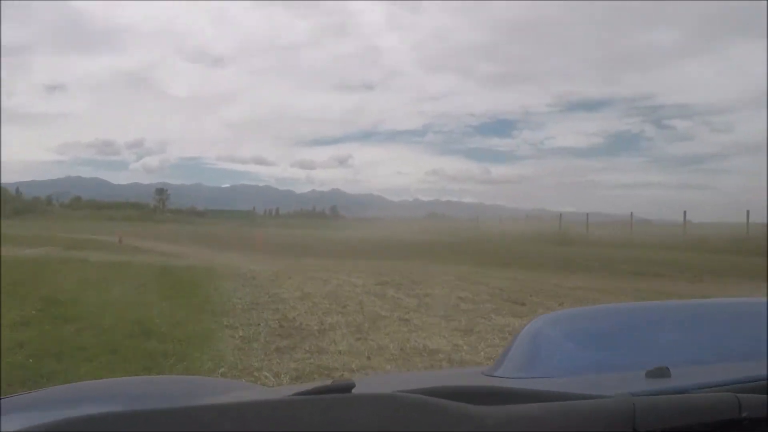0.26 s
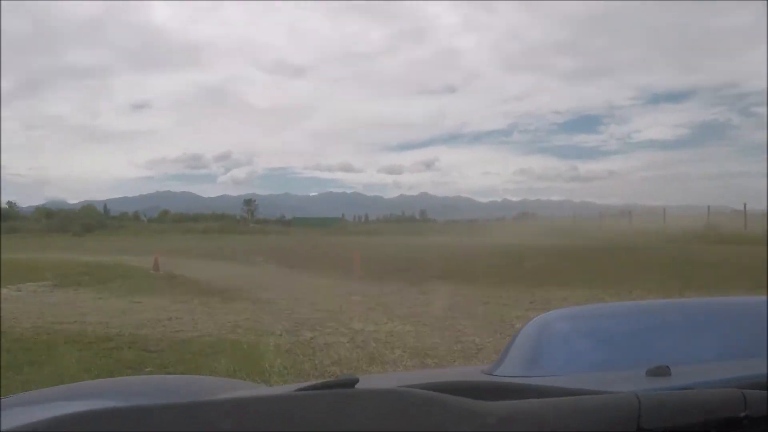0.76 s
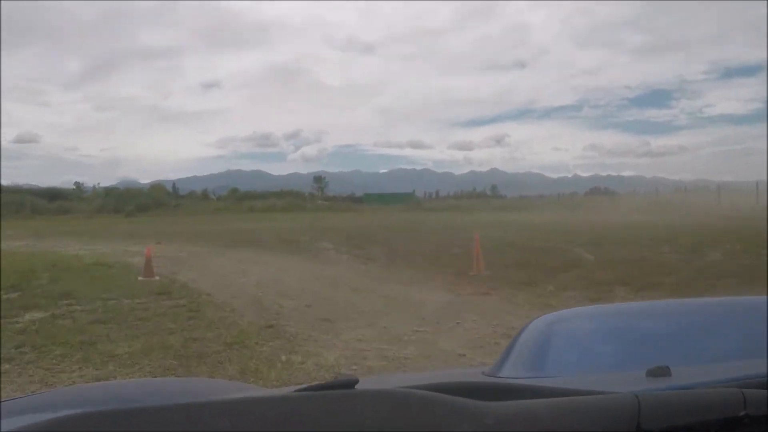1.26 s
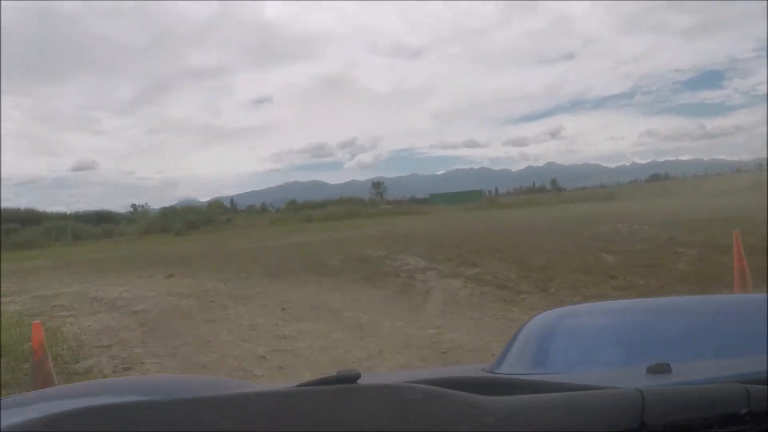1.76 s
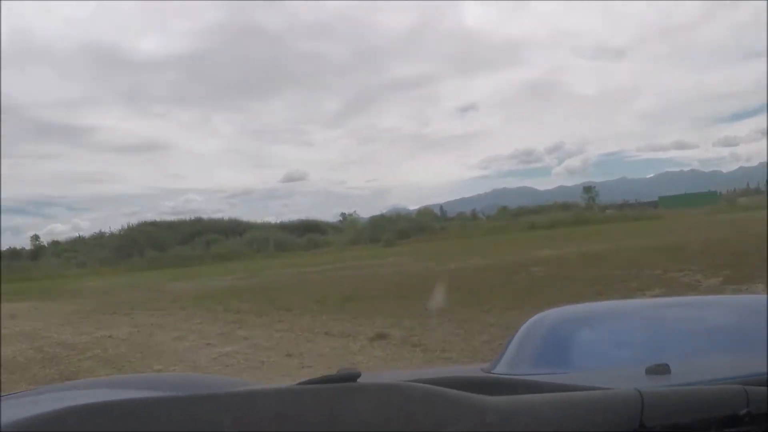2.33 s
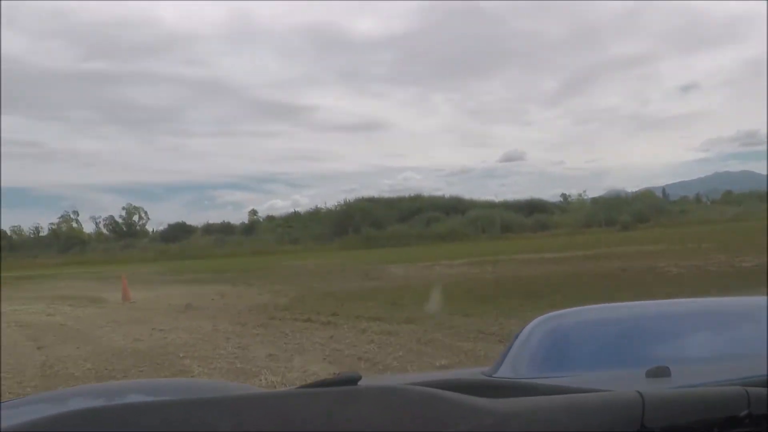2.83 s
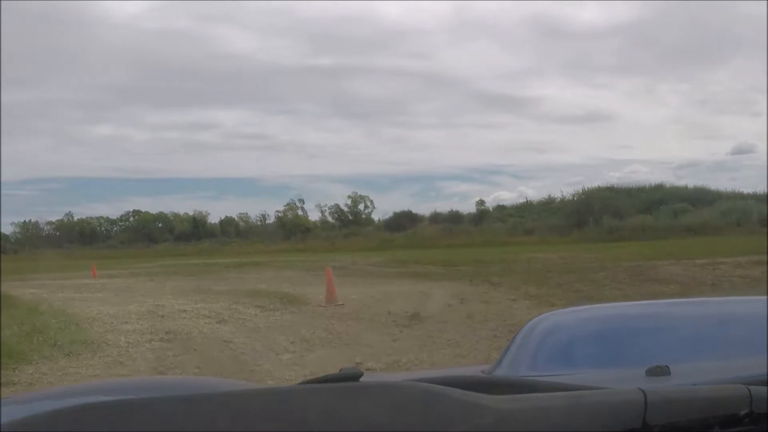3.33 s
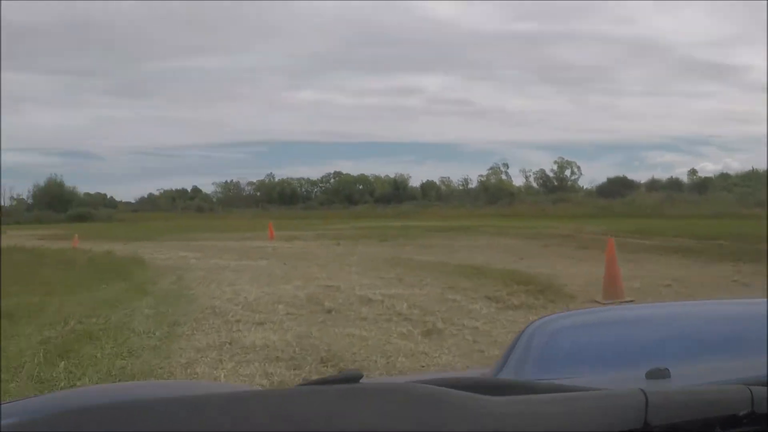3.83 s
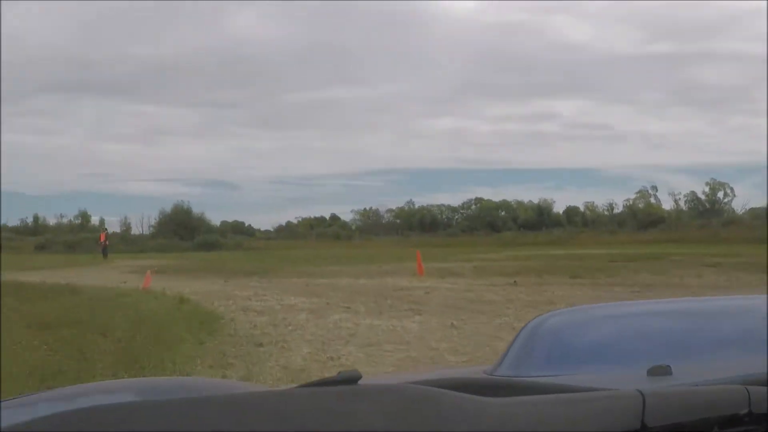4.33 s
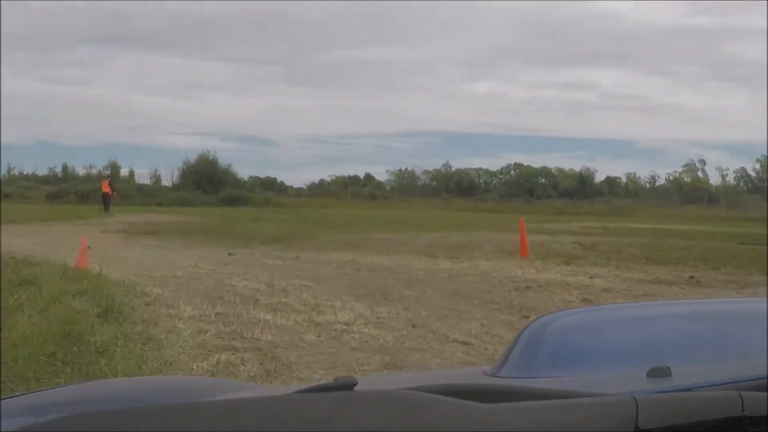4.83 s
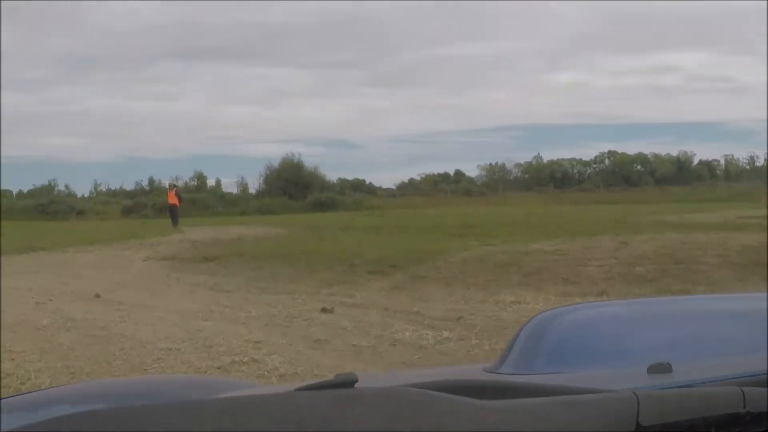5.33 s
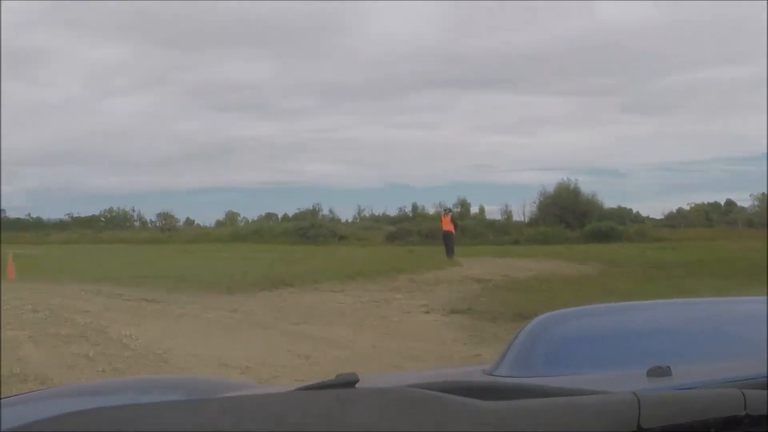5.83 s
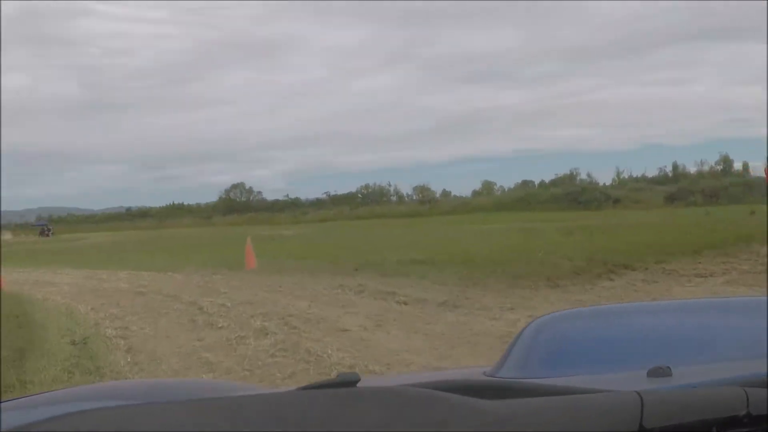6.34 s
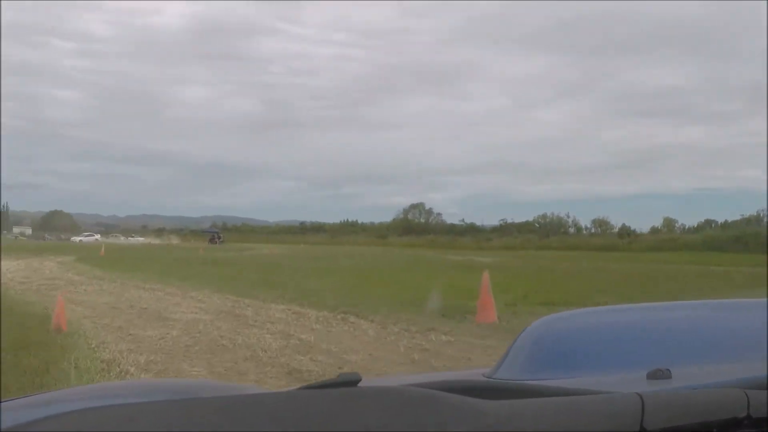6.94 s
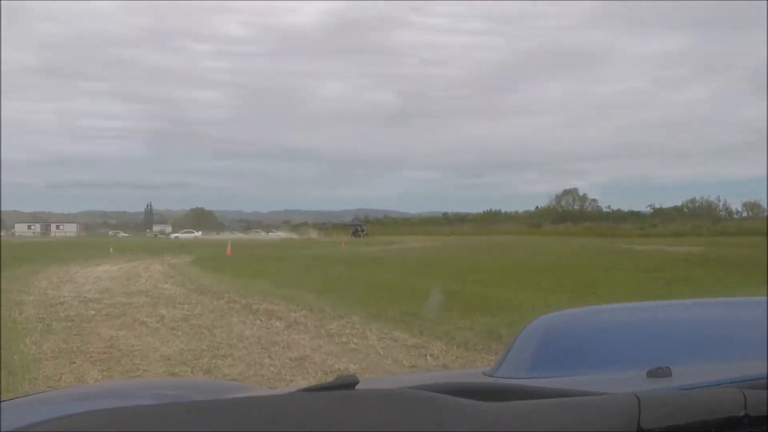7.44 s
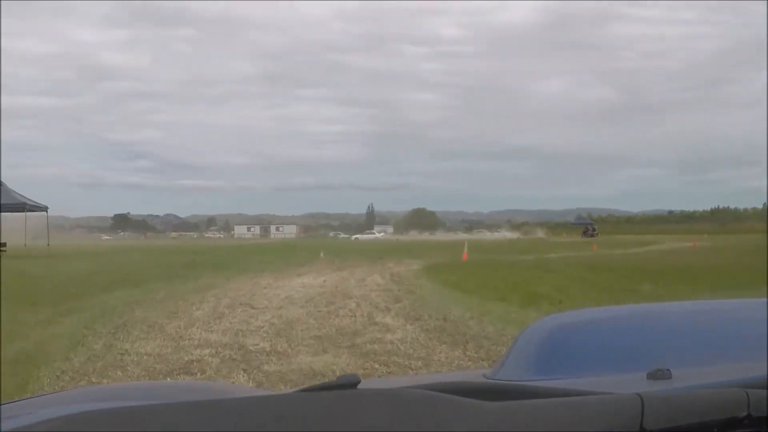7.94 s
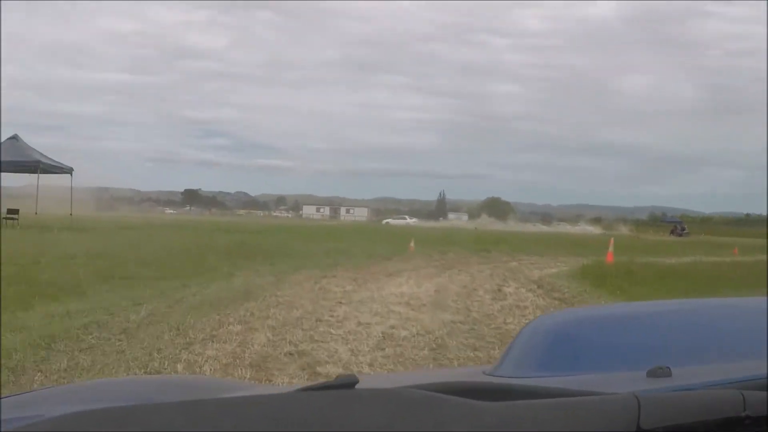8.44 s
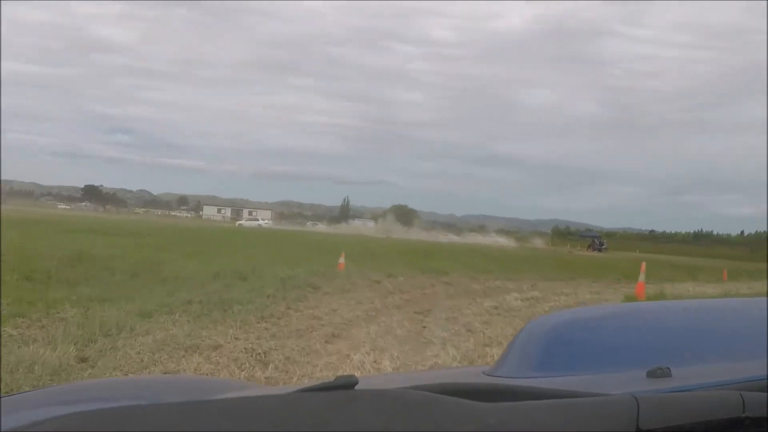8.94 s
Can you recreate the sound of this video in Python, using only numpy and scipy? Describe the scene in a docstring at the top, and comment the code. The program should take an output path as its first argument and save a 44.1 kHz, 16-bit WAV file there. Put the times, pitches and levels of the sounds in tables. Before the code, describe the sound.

A car slides hard around a dirt and grass course, engine droning under heavy wind buffeting while stones tick and crack on its bodywork.

```python
"""A car slides round a dirt and grass course, heard from a camera on its bonnet.
From 0 s: wind buffets the housing into a bass limiter, an engine drones as a stack of crank orders,
tyres scrub as filtered grains, and small stones tick at random. Timed stone contacts, faint to loud,
ring panel modes from 0.2 s; dirt showers from 0.5 s; low body thuds and clunks from 1.3 s; panel
chatter from 2.5 s. The engine sags near 4.6 s and peaks in speed near 7 s."""
import sys
import numpy as np
from scipy import signal
from scipy.fft import rfft, irfft, next_fast_len
from scipy.io import wavfile
from scipy.ndimage import uniform_filter1d, minimum_filter1d, map_coordinates

SR = 44100
rng = np.random.default_rng(int(sys.argv[2]) if len(sys.argv) > 2 else 0)


def materialize(psi):
    """Save the field psi as 16-bit PCM at rate SR to the path in sys.argv[1].

    A 1-D psi becomes a single channel; in a 2-D psi each row is a channel.
    """
    bounded = np.clip(np.atleast_2d(psi).T, -1, 1)
    quanta = np.round(bounded * 32767).astype(np.int16)
    wavfile.write(sys.argv[1], SR, quanta)


N = 405279
T = np.arange(N) / SR


def undb(db):
    """Decibels to gain."""
    return 10 ** (np.asarray(db) / 20)


def unit(x):
    """Scale to rms 1."""
    return x / np.sqrt(np.mean(x ** 2))


def curves(table):
    """Each column of a table, joined by straight lines in time."""
    time_s, *columns = np.transpose(table)
    return [np.interp(T, time_s, column) for column in columns]


def colour(x, points):
    """Shape a spectrum by (frequency [Hz], level [dB]) points, silent beyond them; rms 1."""
    size = next_fast_len(N)
    point_hz, point_db = np.transpose(points)
    bin_hz = np.arange(size // 2 + 1) * SR / size
    bin_db = np.interp(np.log(bin_hz + 1), np.log(point_hz), point_db, left=-np.inf, right=-np.inf)
    return unit(irfft(rfft(x, size) * undb(bin_db), size)[:N])


def walk(rate_hz):
    """Random levels, each held 1 / rate_hz, slewed; rms 1."""
    size = int(SR / rate_hz)
    steps = np.repeat(rng.standard_normal(N // size + 1), size)
    return unit(uniform_filter1d(steps, size))[:N]


def grains(rate_hz, spread_db):
    """Random impacts of either sign, mostly small with a few large ones; rms 1."""
    chance, size, sign = rng.random(N), rng.exponential(size=N), rng.choice([-1, 1], N)
    return unit((chance < rate_hz / SR) * sign * undb(spread_db * np.minimum(size, 5)))


def jolts(rate_hz, fade_s, rise_s):
    """Random bumps that rise quickly and fade; mean near 0, rms 1."""
    kicks = (rng.random(N) < rate_hz / SR) * rng.random(N)
    surge = signal.lfilter([1], [1, -np.exp(-1 / (fade_s * SR))], kicks)
    return unit(uniform_filter1d(surge - surge.mean(), int(rise_s * SR)))


def resonate(x, hz, width_hz):
    """One resonance, gain 1 at its centre."""
    return signal.lfilter(*signal.iirpeak(hz, hz / width_hz, SR), x)


def strike(modes, scrape_s, scrape, scatter):
    """A blow and its crumbling scrape ring decaying modes, randomly detuned; rms 1 over the first 10 ms."""
    t = T[:SR // 5]
    push = scrape * unit(np.exp(-t / scrape_s)) * rng.standard_normal(len(t)) / np.sqrt(len(t))
    push[0] += 1
    ring = np.zeros(len(t))
    for k, (hz, t60_s, db) in enumerate(modes):
        mode_hz = hz * (1 + scatter * rng.standard_normal())
        decay = np.exp(-np.log(1000) * t / t60_s)
        ring += undb(db) * decay * np.sin(2 * np.pi * mode_hz * t) * (-1) ** k
    hit = signal.fftconvolve(push, ring)[:len(t)]
    return hit / np.sqrt(np.mean(hit[:SR // 100] ** 2))


def add(out, time_s, sound):
    """Mix a sound in at time_s."""
    i = max(int(time_s * SR), 0)
    out[i:i + len(sound)] += sound[:N - i]


EDDY_WANDER = .06  # rms share of pitch


def eddies(points, steadiness):
    """Resonant turbulence: pitch wanders with airflow, shed vortices even out the swing of plain noise."""
    flow = np.cumsum(1 + EDDY_WANDER * walk(6))
    noise = colour(rng.standard_normal(N), points)
    x = map_coordinates(noise, [flow], order=1, mode="mirror")
    envelope = np.abs(signal.hilbert(x, next_fast_len(N))[:N])
    swing = uniform_filter1d(envelope, SR // 25)
    return unit(x / (swing + 0.074) ** np.clip(steadiness, 0, 1))


# Wind spectra: (frequency [Hz], relative level [dB])
BUFFET_SPECTRUM = [(10, -27), (18, -6.5), (26, -3.5), (34, -3), (41, 9), (46, 3.5), (52, -1.5), (60, -7.5),
                   (75, -24.5)]
FLUTTER_SPECTRUM = [(45, -42), (62, -8), (80, -2), (100, -5), (120, -3), (135, -11), (155, -17.5),
                    (190, -35), (300, -49)]
# Flutter before swing and lulls: (time [s], level [dB])
FLUTTER_LEVEL = [(0, -15.5), (1.6, -18.5), (2.25, -15), (2.7, -19), (3.6, -20), (4.3, -21), (4.75, -27.5),
                 (5.25, -19.5), (5.85, -19.5), (6.3, -24.5), (6.9, -19), (7.75, -20.5), (8.4, -21),
                 (8.65, -16.5), (8.85, -20), (9.19, -17.5)]
# Buffeting lulls: (time [s], depth [dB], half length to 1/e of depth [s])
LULLS = [(2.401, 15, 0.029), (2.8, 6, 0.063), (4.593, 12.5, 0.051), (5.984, 9.5, 0.094), (7.25, 4, 0.022),
         (8.18, 5, 0.089), (8.531, 8.5, 0.038)]
# Flow swing spectrum: (rate [Hz], relative level [dB])
SWING_SPECTRUM = [(1.8, -10), (3.2, -2), (6, 2), (12, -11.5), (20, -22.5)]
BUFFET_DB, BUFFET_DB_PER_SCRUB_DB = -10, 0.42  # level at 0 dB scrub; slope
SWING_RMS_DB, FLUTTER_DB_PER_LULL_DB = 2.5, 0.5


def wind(scrub_db):
    """Slow housing buffeting under faster flutter; when one weakens the other takes over."""
    swing_db = SWING_RMS_DB * colour(rng.standard_normal(N), SWING_SPECTRUM)
    lull_db = sum(depth_db * np.exp(-((T - s) / half_s) ** 2) for s, depth_db, half_s in LULLS)
    buffet_db = BUFFET_DB + BUFFET_DB_PER_SCRUB_DB * scrub_db - lull_db + swing_db
    flutter_db = curves(FLUTTER_LEVEL)[0] + FLUTTER_DB_PER_LULL_DB * lull_db - swing_db
    buffet = undb(buffet_db) * eddies(BUFFET_SPECTRUM, steadiness=0.38)
    flutter = undb(flutter_db) * eddies(FLUTTER_SPECTRUM, steadiness=0.55)
    return buffet + flutter


# Engine: (time [s], crankshaft speed [turns/s], effort at order 2 [dB])
REVS = [(0, 61.5, -3), (.4, 59.7, -2), (.9, 56.5, 0), (1.2, 54.3, -2), (1.5, 59.3, 0), (1.8, 55, -1),
        (2.15, 56, -1), (2.5, 54, -1), (3, 56, -1), (3.3, 52, 0), (3.6, 55, -2), (4.1, 55, -3),
        (4.6, 48, -9), (5.2, 48.5, -6), (5.9, 51.8, 0), (6.35, 57.2, 1), (6.5, 61.5, 2), (6.65, 63, 4.8),
        (6.8, 61.5, 2.5), (6.92, 65.5, 4), (7.0, 70.6, 0), (7.1, 70.3, 0), (7.2, 66.3, -2), (7.3, 67.6, -1),
        (7.4, 63.5, -1.5), (7.55, 68, -1), (7.9, 56, -2), (8.2, 53.5, -2), (8.7, 54.5, -1.5),
        (9.19, 58, -1)]
# Exhaust and body response: (frequency [Hz], gain [dB])
EXHAUST_RESPONSE = [(85, -1), (100, 5.5), (110, 5.5), (126, 1), (142, -7), (160, -5), (200, 0), (222, 3.5),
                    (255, 0), (283, 5), (310, 0), (335, -1), (360, 2), (377, 7), (395, 6), (415, 1),
                    (440, 6), (470, -1), (520, -4), (700, -10)]
# Engine lines before effort and exhaust: (multiple of crank speed [1], level [dB])
ENGINE_ORDERS = [(2, -30), (2.5, -35), (3, -45), (3.5, -48), (4, -41), (4.5, -46), (5, -49), (5.5, -53),
                 (6, -44.5), (6.5, -53), (7, -51), (7.5, -57), (8, -53), (9, -58), (10, -57)]
BRIGHTEN_PER_ORDER = .2  # extra effort share per order above 2
LEVEL_ROUGHNESS = .2  # rms share of level


def engine():
    """Crank-order tones glide through resonances, speed and level wavering at random."""
    crank_hz, effort_db = curves(REVS)
    waver = 1 + .0045 * walk(16)
    turns = np.cumsum(crank_hz * waver) / SR
    response_hz, response_db = np.transpose(EXHAUST_RESPONSE)
    out = np.zeros(N)
    for order, order_db in ENGINE_ORDERS:
        order_effort_db = effort_db * (1 + BRIGHTEN_PER_ORDER * (order - 2))
        exhaust_db = np.interp(order * crank_hz, response_hz, response_db)
        level_db = order_db + order_effort_db + exhaust_db + 2 * walk(9)
        out += undb(level_db) * np.sin(2 * np.pi * (order * turns + rng.random()))
    return out * (1 + LEVEL_ROUGHNESS * walk(55))


# Tyre spectra: (frequency [Hz], relative level [dB])
RUMBLE_SPECTRUM = [(100, -18), (160, 1), (210, 3), (300, -1.5), (450, -11.5), (650, -17), (1000, -31.5),
                   (2000, -67.5)]
SOIL_SPECTRUM = [(250, -7.5), (500, 6.5), (750, 3), (1000, 0.5), (1280, -3.5), (1550, -15.5), (1900, -6.5),
                 (2600, -39.5)]  # also the spurts with clunks
CRUNCH_SPECTRUM = [(900, -13.5), (1400, 6), (1800, -3.5), (2200, -3), (2550, -3.5), (2900, -14),
                   (4500, -39.5)]
GRIT_SPECTRUM = [(2000, -18), (2900, -5), (3500, -2.5), (4300, -1), (5300, -5.5), (6400, -7.5),
                 (7500, -13.5), (8500, -13), (10000, -16.5), (12000, -25), (15500, -47.5)]  # also crumbs, showers
# Levels at 0 dB scrub, drum and thrown; slopes in dB per dB
RUMBLE_DB, RUMBLE_PER_SCRUB = -33, 0.083
SOIL_DB, SOIL_PER_SCRUB = -38.5, 1.48
CRUNCH_DB, CRUNCH_PER_SCRUB, CRUNCH_PER_THROWN = -51, 0.81, 0.76
GRIT_DB = -58.5


def tyres(scrub_db, drum_db, thrown_db):
    """Clods drum, soil churns, gravel crunches, grit sprays: grains that surge together over bumps."""
    bumps = jolts(rate_hz=70, fade_s=.011, rise_s=.0015)
    clods, lumps = grains(500, spread_db=2.4), grains(1300, spread_db=2.7)
    gravel, sand = grains(7000, spread_db=2.6), grains(7000, spread_db=2.3)
    pebbles = undb(-11) * grains(90, spread_db=1.8)  # tick in soil, crunch and grit at once
    rumble_db = RUMBLE_DB + drum_db + RUMBLE_PER_SCRUB * scrub_db + 1.4 * bumps + 1.0 * walk(25)
    soil_db = SOIL_DB + SOIL_PER_SCRUB * scrub_db + 1.33 * bumps
    crunch_db = CRUNCH_DB + CRUNCH_PER_SCRUB * scrub_db + CRUNCH_PER_THROWN * thrown_db
    crunch_db = crunch_db + 2.6 * bumps + 1.0 * walk(40)
    grit_db = GRIT_DB + thrown_db + .9 * bumps + 1.3 * walk(40)
    rumble = undb(rumble_db) * colour(clods, RUMBLE_SPECTRUM)
    soil = undb(soil_db) * colour(lumps + 1.2 * pebbles, SOIL_SPECTRUM)
    crunch = undb(crunch_db) * colour(gravel + pebbles, CRUNCH_SPECTRUM)
    grit = undb(grit_db) * colour(sand + 1.4 * pebbles, GRIT_SPECTRUM)
    return rumble + soil + crunch + grit


# Modes rung by stones: (frequency [Hz], t60 [s], relative level [dB])
PANEL_MODES = [(360, 0.025, -1), (734, 0.02, -5), (1274, 0.016, -3), (1430, 0.012, -1), (1620, 0.0085, 5),
               (1860, 0.014, -4)]  # also chatter
PING_MODES = [(3300, 0.006, -6), (3860, 0.013, -5), (4150, 0.0065, 1), (4960, 0.004, -5),
              (5900, 0.008, -13), (8150, 0.0083, -20), (8500, 0.0098, -21), (11600, 0.0021, -34)]
CLACK_TOP_HZ, PING_BOTTOM_HZ = 2250, 2750
CONTACT_TOP_HZ = 10200  # dusty stones give little above this
CRACK_BAND_HZ, CRACK_FADE_S, CRACK_RE_CLACK_DB = (450, 1900), .0025, -6


def stone(clack_db, ping_db, clack_gain_db=-5.5, ping_gain_db=.5):
    """One stone contact: a broad crack, a dull panel clack and a short hard ping."""
    clack = strike(PANEL_MODES, scrape_s=.002, scrape=.45, scatter=.045)
    ping = strike(PING_MODES, scrape_s=.002, scrape=.55, scatter=.04)
    burst = rng.standard_normal(len(clack)) * np.exp(-T[:len(clack)] / CRACK_FADE_S)
    crack = signal.lfilter(*signal.butter(2, CRACK_BAND_HZ, "bandpass", fs=SR), burst)
    crack = crack / np.std(crack[:SR // 100])
    low = clack + undb(CRACK_RE_CLACK_DB) * crack
    dull = signal.lfilter(*signal.butter(4, CLACK_TOP_HZ, fs=SR), low)
    ping_band_hz = (PING_BOTTOM_HZ, CONTACT_TOP_HZ)
    hard = signal.lfilter(*signal.butter(3, ping_band_hz, "bandpass", fs=SR), ping)
    return undb(clack_db + clack_gain_db) * dull + undb(ping_db + ping_gain_db) * hard


# Mean inputs to stone() at 0 dB scrub, before its gains
SMALL_CLACK_DB, SMALL_PING_DB = -43, -58


def small_stones(scrub_db, spread_db=1.0, count=44):
    """Small stones tick on panels at random times, harder when the tyres scrub harder."""
    out = np.zeros(N)
    for _ in range(count):
        i = rng.integers(N)
        size_db = scrub_db[i] + spread_db * rng.standard_normal()
        add(out, T[i], stone(SMALL_CLACK_DB + size_db, SMALL_PING_DB + size_db))
    return out


def chatter():
    """A loose panel taps its rests at random, ringing its modes; rms 1."""
    taps = grains(500, spread_db=1.5)
    ring = np.zeros(N)
    for hz, t60_s, db in PANEL_MODES:
        ring += undb(db) * resonate(taps, hz, np.log(1000) / (np.pi * t60_s))
    return unit(signal.sosfilt(signal.butter(4, CLACK_TOP_HZ, fs=SR, output="sos"), ring))


# Stone contacts at set times, from faint ticks to loud cracks, levels before stone() gains:
# (time [s], clack level [dB], ping level [dB])
STONE_CONTACTS = [(.1781, -33, -46), (.349, -37, -52), (.4229, -29.5, -57), (.639, -29, -49),
                  (.864, -32, -60), (.9, -32, -58), (.9534, -29, -55), (.988, -33, -54), (1.06, -38, -52),
                  (1.1499, -27, -49), (1.155, -27, -46), (1.162, -27, -50), (1.4392, -33, -57),
                  (1.6677, -28, -60), (1.745, -33, -54), (1.8298, -28, -50), (1.8563, -33, -58),
                  (2.0957, -29, -50), (2.2345, -15, -29), (2.247, -27, -45), (2.26, -29, -46),
                  (2.2798, -28, -50), (2.3202, -23.5, -51), (2.329, -28, -49), (2.3856, -32, -56),
                  (2.623, -29, -49), (2.7054, -35, -54), (2.8161, -34, -54), (2.9977, -18.5, -41),
                  (3.003, -26, -49), (3.0311, -29, -52), (3.0506, -32, -63), (3.064, -33, -51),
                  (3.1399, -21, -50), (3.149, -30, -52), (3.1668, -32, -58), (3.1785, -28, -58),
                  (3.1972, -30, -60), (3.2776, -28, -54), (3.3369, -20, -46), (3.346, -25, -56),
                  (3.4711, -27, -60), (3.481, -29, -57), (4.0254, -17.5, -37), (4.034, -29, -47),
                  (4.0502, -27, -43), (4.062, -28, -44), (4.0755, -31, -39), (4.0797, -27, -23.5),
                  (4.091, -29, -45), (4.1032, -29, -25.5), (4.2805, -42, -50), (4.5222, -42, -59),
                  (4.72, -48, -63), (4.9452, -39, -56), (5.7549, -37, -54), (5.801, -40, -54),
                  (5.921, -37, -58), (5.981, -44, -53), (6.1545, -35, -55), (6.2373, -37, -56),
                  (6.5215, -29, -42), (6.8594, -28.5, -57), (7.3074, -31, -50), (7.5823, -30.5, -54),
                  (7.7095, -31, -53), (7.93, -27, -50), (8.0971, -30, -50), (8.3455, -28.5, -55),
                  (8.479, -42, -54), (8.8488, -38, -51), (8.9317, -32, -52), (8.9989, -44, -50),
                  (9.0473, -40, -46)]
# Shell modes, also body thuds: (frequency [Hz], t60 [s], relative level [dB])
THUD_MODES = [(178, 0.03, -13.5), (272, 0.027, 0.5), (310, 0.12, -6.5), (414, 0.052, 2.5),
              (502, 0.085, -8.5), (590, 0.021, 3)]
# Relative to the clack and ping inputs of stone()
CHATTER_RE_CLACK_DB, CHATTER_FADE_S = -24, .03
CRUMBS_RE_PING_DB, CRUMBS_FADE_S = -15, .014


def stone_contacts(thud_re_clack_db=-9):
    """Stone contacts at set times, faint to loud: contact, shell thud, fading chatter and crumbs."""
    out = np.zeros(N)
    panel = chatter()
    crumbs = colour(grains(1500, spread_db=1.5), GRIT_SPECTRUM)
    t = T[:SR // 4]
    for s, clack_db, ping_db in STONE_CONTACTS:
        thud = strike(THUD_MODES, scrape_s=.02, scrape=.7, scatter=.08)
        add(out, s, undb(clack_db + thud_re_clack_db) * thud)
        add(out, s, stone(clack_db, ping_db))
        tails = [(panel, clack_db + CHATTER_RE_CLACK_DB, CHATTER_FADE_S),
                 (crumbs, ping_db + CRUMBS_RE_PING_DB, CRUMBS_FADE_S)]
        for tail, db, fade_s in tails:
            excerpt = np.roll(tail, -int(s * SR))[:len(t)]
            add(out, s, undb(db) * np.exp(-t / fade_s) * excerpt)
    return out


# Dirt showers: (time of peak [s], level [dB], rise and fade to 1/e [s], ring [Hz], ring width [Hz])
SHOWERS = [(0.485, -40.5, 0.0055, 4270, 700), (0.545, -45, 0.0093, 4670, 600),
           (0.62, -48.5, 0.056, 4600, 700), (0.714, -46, 0.014, 5600, 900),
           (1.157, -37.5, 0.008, 4700, 250), (1.797, -48, 0.03, 4270, 900), (1.99, -48, 0.008, 4500, 900),
           (2.106, -44, 0.012, 3960, 400), (2.232, -36, 0.017, 5270, 500), (2.461, -35.5, 0.011, 5150, 140),
           (3.293, -42, 0.014, 7000, 700), (3.363, -44.5, 0.015, 5030, 900),
           (3.872, -44, 0.0077, 4040, 500), (4.075, -37, 0.022, 4500, 400), (4.157, -48, 0.0069, 5530, 500),
           (4.255, -50, 0.0091, 4600, 400), (5.73, -45, 0.012, 5430, 500), (6.527, -40, 0.0094, 7060, 700),
           (6.673, -43, 0.012, 4880, 500), (7.861, -45, 0.0092, 3980, 400), (8.376, -49, 0.01, 5800, 600),
           (8.89, -48, 0.012, 5170, 700), (9.0, -53.5, .08, 4400, 700), (9.019, -40, 0.0067, 4350, 300),
           (9.055, -40, 0.0061, 4100, 250)]
# Neighbouring rings: ratio to the main ring [1]
RING_RATIOS = [.77, .9, 1.14]
RING_GAIN, NEIGHBOUR_GAIN = 2.6, .6  # ring re spray; neighbours re main ring


def showers():
    """Handfuls of dirt swell and fade on the bodywork, ringing the part they meet."""
    spray = colour(grains(1800, spread_db=1.2), GRIT_SPECTRUM)
    out = np.zeros(N)
    for s, db, fade_s, hz, width_hz in SHOWERS:
        neighbours = sum(resonate(spray, hz * ratio, width_hz / 2) for ratio in RING_RATIOS)
        ring = resonate(spray, hz, width_hz) + NEIGHBOUR_GAIN * neighbours
        out += undb(db) * np.exp(-np.abs(T - s) / fade_s) * unit(spray + RING_GAIN * ring)
    return out


# Thuds and clunks before the envelope:
# (time [s], thud level [dB], clunk level [dB], thud pitch ratio [1])
BODY_THUDS = [(1.29, -27, -45, 0.92), (2.213, -22, -29, 0.51), (2.236, -15.5, -41, 0.45),
              (2.997, -27, -48, 0.93), (3.345, -23.5, -47, 0.85), (4.024, -23, -49, .76),
              (4.056, -21, -31, 0.9), (4.2496, -16, -31, 0.926), (4.262, -30, -38, 1.08),
              (4.285, -30, -47, 0.85), (4.325, -41, -38.5, 1), (6.52, -34, -27.5, 1.06),
              (7.305, -19, -48, 0.54), (8.062, -37, -30, 0.79), (8.092, -30, -34, 0.84)]
# Hollow clunk modes: (frequency [Hz], t60 [s], relative level [dB])
CLUNK_MODES = [(650, 0.066, -2.5), (810, 0.068, -3.5), (878, 0.12, 3), (1100, 0.076, -7.5),
               (1470, 0.06, -8)]
SPURT_RE_CLUNK_DB, SPURT_FADE_S = -0.5, 0.034  # before the envelope
THUD_RISE_S, THUD_FADE_S = 0.0015, 0.072  # envelope of thud, clunk and spurt


def body_thuds():
    """Low body thuds, some under stone hits, and hollow clunks with a spurt of soil."""
    out = np.zeros(N)
    soil = colour(rng.standard_normal(N), SOIL_SPECTRUM)
    for s, thud_db, clunk_db, pitch in BODY_THUDS:
        thud_modes = [(hz * pitch, t60_s, db) for hz, t60_s, db in THUD_MODES]
        thud = strike(thud_modes, scrape_s=.02, scrape=.7, scatter=.03)
        clunk = strike(CLUNK_MODES, scrape_s=.02, scrape=.55, scatter=.015)
        t = T[:len(thud)]
        excerpt = np.roll(soil, int(s * SR))[:len(t)]
        spurt = undb(SPURT_RE_CLUNK_DB) * np.exp(-t / SPURT_FADE_S) * excerpt
        envelope = (1 - np.exp(-t / THUD_RISE_S)) * np.exp(-t / THUD_FADE_S)
        add(out, s, envelope * (undb(thud_db) * thud + undb(clunk_db) * (clunk + spurt)))
    return out


# Bonnet rattles as the car shakes: (time of peak [s], level [dB], rise and fade to 1/e [s])
RATTLES = [(2.462, -35.5, 0.017), (3.18, -48, 0.018), (3.295, -39, 0.013), (3.49, -40, 0.011),
           (3.542, -42, .016), (3.63, -43, .015), (4.068, -39, .018)]


def rattles():
    """Short spells of panel chatter that swell and fade."""
    level = sum(undb(db) * np.exp(-np.abs(T - s) / fade_s) for s, db, fade_s in RATTLES)
    return chatter() * level


# Tyre drive, near 0 dB in a hard slide: (time [s], scrub [dB], clod drumming [dB], thrown grit [dB])
GROUND = [(0, -1, 1.5, 1.5), (.54, -1, -2, 1.5), (.75, -0.5, -4, 3), (.93, 1, 5, 3), (1.12, -1, 0, 2.5),
          (1.29, 1.5, 2, 3), (1.5, -2, -1.5, -1), (1.83, 0.5, -1.5, 3.5), (2.22, 0, -2.5, 3),
          (2.5, 0, -2.5, -1), (2.85, -4, -4.5, 0.5), (3.27, 1.5, 3.5, 1), (3.63, -3.5, -5.5, -1),
          (4.08, 2, 3.5, 6.5), (4.17, -1.5, -6, -1.5), (4.33, -3, -2, 2), (4.39, -9, -6.5, -8),
          (4.75, -9.5, -9.5, -9.5), (4.95, -3, -5, 0), (5.22, -5.5, -3, -0.5), (5.48, 1, -2, 3),
          (6.0, -4, -9, -3.5), (6.45, -2.5, -6, 0), (6.8, 0.5, -3, 2.5), (7.5, -0.5, 0, 1.5),
          (7.72, 2.5, 2, 4), (7.95, -0.5, 1.5, 3.5), (8.22, -1, -4.5, 1), (8.5, -3, -3, 1),
          (8.75, 0, 0, 2.5), (9.19, -1.5, -1.5, 3.5)]


def scene():
    """Everything that reaches the bonnet."""
    scrub_db, drum_db, thrown_db = curves(GROUND)
    steady = wind(scrub_db) + engine() + tyres(scrub_db, drum_db, thrown_db)
    hits = small_stones(scrub_db) + stone_contacts() + showers() + body_thuds() + rattles()
    return (steady + hits)[None]


TOP_HZ = 15700


def record(dry, ceiling=0.56, split_hz=170):
    """The camera holds the bass under a ceiling with a fast limiter and cuts the top."""
    bass = signal.sosfiltfilt(signal.butter(4, split_hz, fs=SR, output="sos"), dry)
    size = SR // 60
    needed_gain = ceiling / np.maximum(np.abs(bass), ceiling)
    gain = uniform_filter1d(minimum_filter1d(needed_gain, size), size)
    limited = dry - bass + gain * bass
    return signal.sosfilt(signal.ellip(8, .2, 70, TOP_HZ, fs=SR, output="sos"), limited)


dry = scene()
out = record(dry)
materialize(out)
```